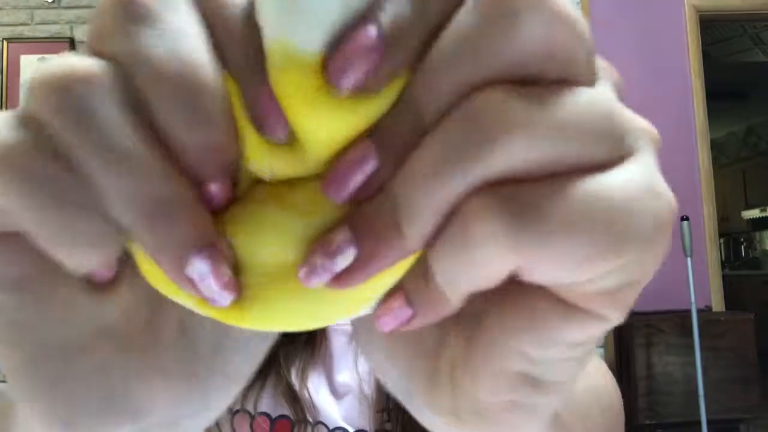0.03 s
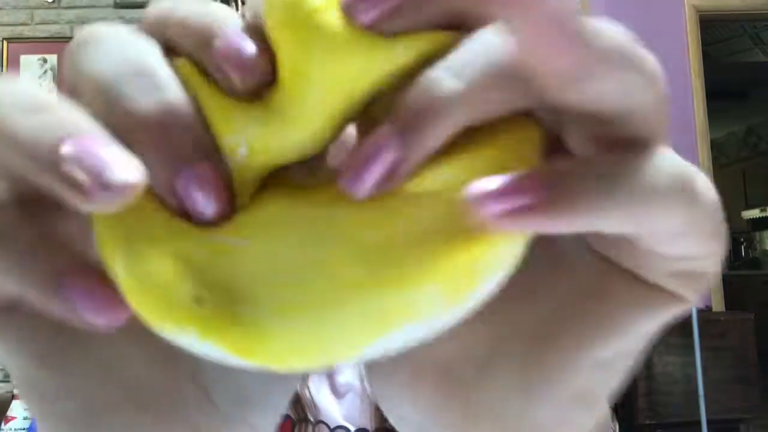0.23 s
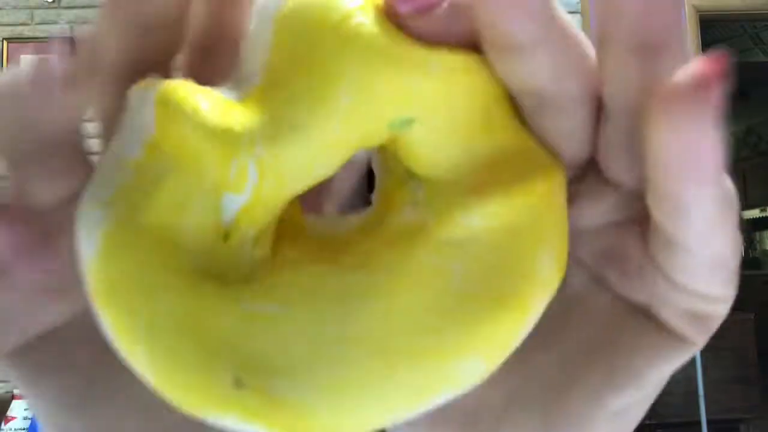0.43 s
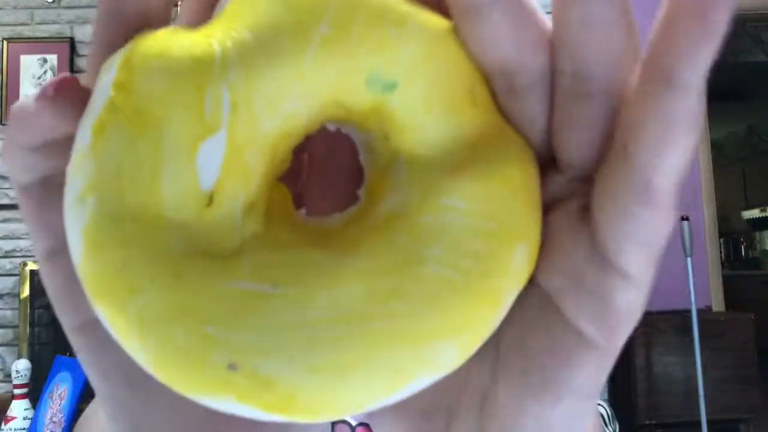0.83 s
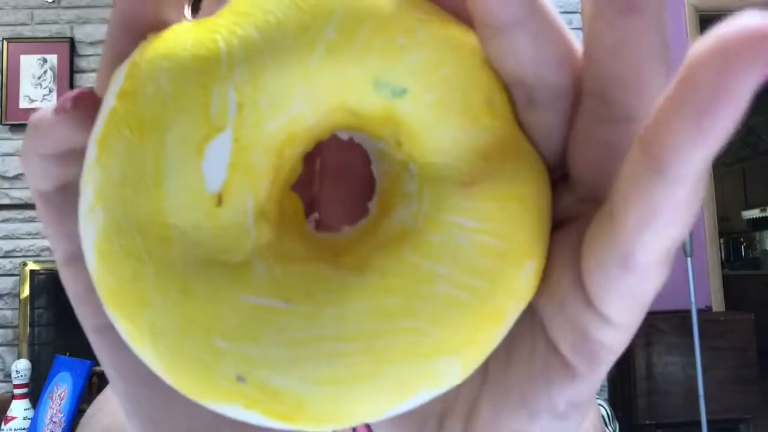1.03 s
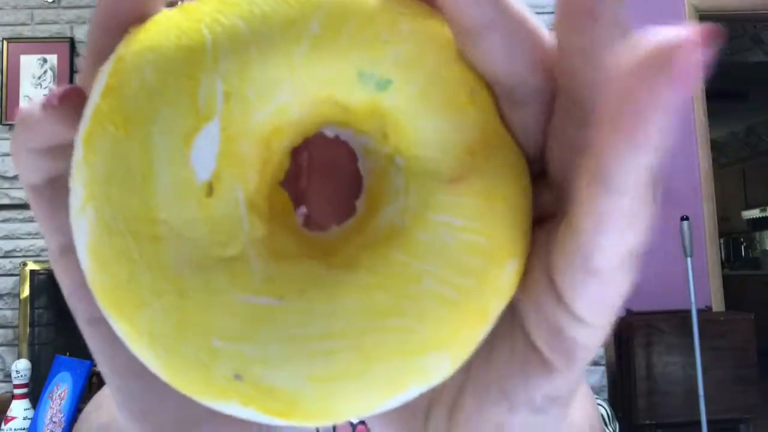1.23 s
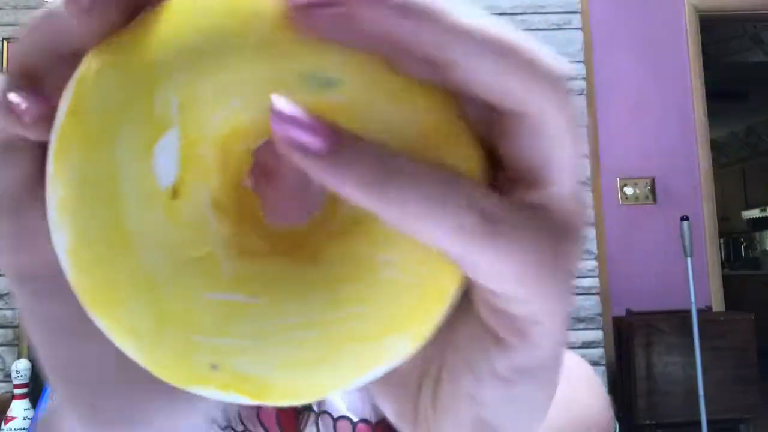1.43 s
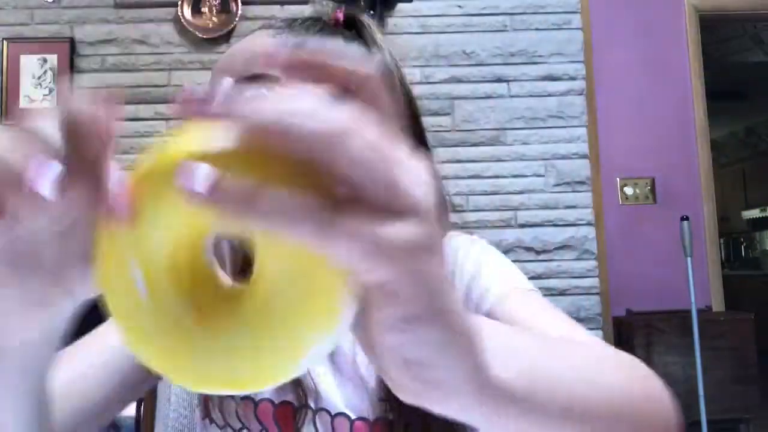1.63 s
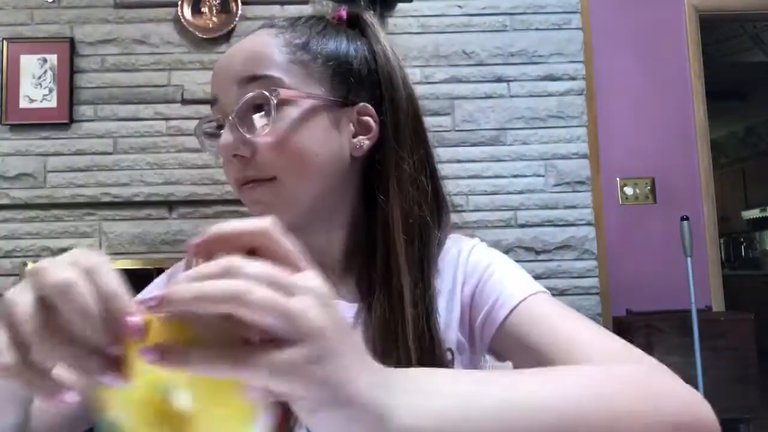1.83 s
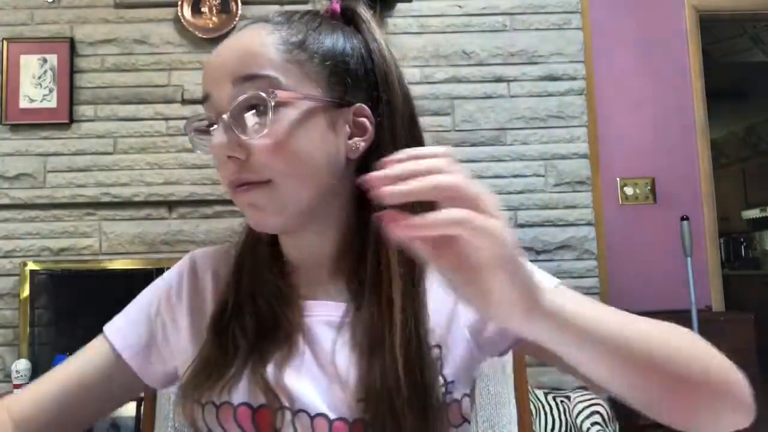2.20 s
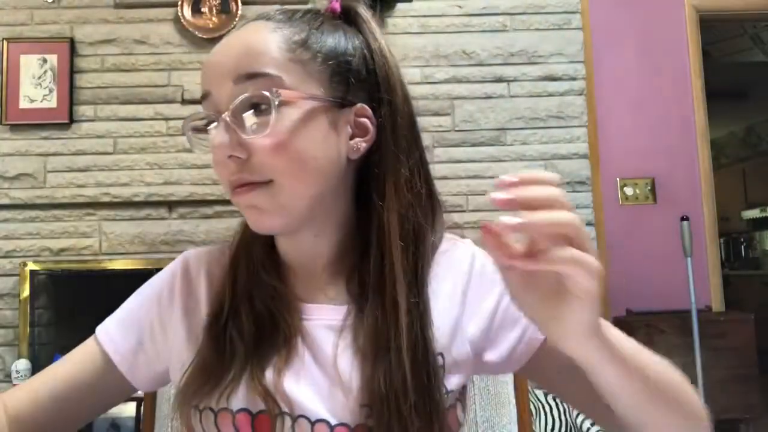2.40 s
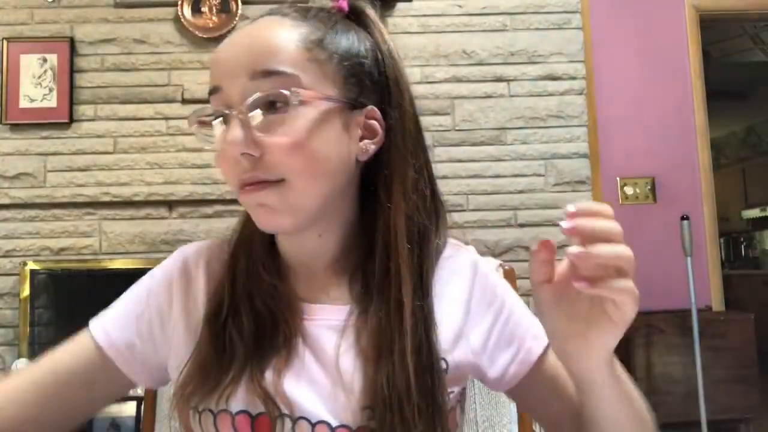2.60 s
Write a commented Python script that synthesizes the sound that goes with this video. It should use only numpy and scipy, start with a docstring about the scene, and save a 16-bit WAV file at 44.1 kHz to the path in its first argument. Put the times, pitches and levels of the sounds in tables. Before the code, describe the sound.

A squeezed foam toy is released close by, its tacky skin peeling apart in a dense crackle with sharp snaps, loudest near 0.4 seconds. After a pause, fingers brush and pat it around 1.7 seconds, followed by faint sleeve and hair rustles. At 2.4 seconds it lands on a table with a soft tap and low thump, then an arm slides faintly away. Ventilation rumbles low in the small room.

```python
"""A foam toy released and put down

Fingers let go of a squeezed foam toy close by: its tacky skin peels apart in a dense crackle with
sharp snaps. The hands shift and brush over it, then it is put down with a soft tap and a low thump
of the table; an arm slides away. The room is small, dry and quiet, with a low ventilation rumble."""
import sys
import numpy as np
from scipy import signal
from scipy.fft import rfft, irfft
from scipy.io import wavfile
from scipy.ndimage import uniform_filter1d

SR = 44100
rng = np.random.default_rng(int(sys.argv[2]) if len(sys.argv) > 2 else 0)


def master(y):
    """Save y as 16-bit WAV."""
    cut = np.clip(np.atleast_2d(y).T, -1, 1)
    pcm = np.round(cut * 32767)  # scale
    wavfile.write(sys.argv[1], SR, pcm.astype(np.int16))


N = 121275

# Spectra of the ventilation and of the room's tail. Each row: frequency in Hz, relative level in dB.
AIR_COLOUR = [(32, -28), (45, -16), (76, -9.5), (111, -3), (160, -4), (250, -9), (400, -13.5), (550, -19.5),
              (820, -23.5), (2000, -32.5), (4740, -35), (7500, -38), (9000, -41.5), (16000, -44)]
ROOM_COLOUR = [(200, -16), (3000, 3), (14000, -15)]
# Strokes of contact. Each row: time of the peak, rise and fall, all in seconds, level in dB.
SLIDES = [(2.73, 0.11, .1, -67.5)]  # the arm on the table
BRUSHES = [(1.655, 0.024, 0.0099, -54.5), (1.685, 0.015, 0.012, -49.5), (1.732, 0.017, 0.008, -55.5),
           (1.776, 0.019, .035, -57)]  # fingers on the foam
RUSTLES = [(1.993, 0.0087, 0.01, -62.5), (2.251, .003, 0.004, -54.5), (2.283, 0.021, 0.014, -59),
           (2.445, 0.026, 0.03, -59.5)]  # sleeve and hair
BUMPS = [(0.39, 0.0076, 0.027, -51), (1.6, 0.11, 0.071, -54.5), (2.207, 0.0074, 0.0085, -50.5)]  # the foam springing back and shifting
# Spectra of those strokes. Each row: frequency in Hz, relative level in dB.
SLIDE_COLOUR = [(400, -6), (900, -16), (1500, 9), (2200, 2), (3200, -19), (8000, -33)]
BRUSH_COLOUR = [(300, -22), (1100, 4.5), (2500, 2), (5000, 2), (12000, 1), (16000, -1)]
RUSTLE_COLOUR = [(400, -2), (1000, 1), (2000, 11.5), (3500, -1.5), (6500, 6), (9000, -8), (16000, -14)]
BUMP_COLOUR = [(50, -28), (150, 12.5), (280, -2), (600, -9), (2000, -36)]
# Taps on the table. Each row: start in seconds, relative level in dB.
TAPS = [(2.4279, -37), (2.4395, -55), (2.4528, -49)]
# Spectrum of a tap's click. Each row: frequency in Hz, relative level in dB.
TAP_COLOUR = [(200, -5), (600, 12), (1030, 6), (1500, -21), (2270, -1.5), (4300, -6), (5500, -5),
              (8000, -10), (16000, -15)]
# Low and high modes of the board. Each row: frequency in Hz, relative level in dB, T60 in seconds.
THUMP_MODES = [(77, 2.5, 0.17), (97, -4.5, 0.36), (127, -7.5, 0.22), (152.5, -9, 0.3), (218, -3, 0.059),
               (307, -9.5, 0.054)]
KNOCK_MODES = [(1030, 1.5, 0.026), (1680, 2.5, 0.024), (2220, 6.5, 0.016), (3020, 5.5, 0.011),
               (3530, 2, 0.014), (5480, 6, 0.011), (7440, 0, 0.007)]
# Fingertip pats on the foam. Each row: start in seconds, level in dB over 1 ms, initial pitch in Hz.
PATS = [(0.3139, -34, 1790), (1.6406, -38, 1280), (1.6502, -37.5, 1220), (1.6744, -40, 1250)]
# Snaps and low pops of the skin, and ticks of nails.
# Each row: start in seconds, level in dB over 1 ms, lower and upper band edges in Hz.
SNAPS = [(.068, -45.5, 2500, 8000), (0.1442, -41, 1200, 4000), (0.1593, -42.5, 2500, 6000),
         (0.195, -42, 800, 1800), (0.2237, -34, 890, 7000), (0.2334, -31, 700, 7000),
         (0.2469, -34, 1800, 8000), (.2562, -32, 164, 350), (0.2572, -25, 4600, 13100),
         (0.2593, -38.5, 454, 2000), (0.2762, -43, 1500, 3000), (0.2771, -34, 650, 8000),
         (0.3128, -28, 1400, 7000), (0.3337, -39, 1800, 8000), (0.3509, -37, 1050, 1740),
         (0.37, -42, 1500, 8000), (0.3733, -39, 700, 5000), (0.382, -28, 796, 7060),
         (0.3919, -24.5, 1300, 12400), (0.3964, -28.5, 1300, 9700), (0.4132, -42, 1500, 11000),
         (0.4175, -34.5, 895, 3960), (1.64, -37.5, 4000, 15000), (1.6497, -38.5, 3270, 5100),
         (1.6666, -51, 7000, 15000), (1.675, -41.5, 3000, 4970), (1.7628, -51.5, 1300, 6000),
         (1.947, -43.5, 1380, 9400), (2.0819, -50.5, 3900, 15000), (2.1125, -49, 1800, 10000),
         (2.251, -54, 5000, 10000), (2.256, -49.5, 5500, 7500), (2.276, -53, 1400, 6000),
         (2.5107, -52.5, 1000, 11000)]
# Envelope of the peeling as the foam swells back. Each row: time in seconds, relative level in dB.
PEEL_ENVELOPE = [(.03, -90), (.08, -57), (.1, -53), (.15, -53), (.172, -50), (.192, -48.5), (0.222, -37),
                 (.243, -43), (.268, -40), (0.279, -34.5), (.288, -56), (.325, -50), (0.356, -50.5),
                 (.372, -35.5), (.379, -35.5), (.389, -29), (0.3968, -25.5), (0.4, -40), (.409, -42.5),
                 (0.415, -35.5), (0.438, -53), (.455, -63)]
# Spectrum of the peeling. Each row: frequency in Hz, relative level in dB.
PEEL_COLOUR = [(120, 1), (330, -6.5), (520, -1), (640, -4.5), (810, .5), (1000, -3), (1200, -0.5),
               (1530, -1), (2050, -8), (2480, -3.5), (3050, -10), (3600, -4.5), (4600, -7), (5500, -5),
               (7800, -7), (8600, -9.5), (13000, -5.5), (16000, -12)]

SKIN_LAG_S = .0013  # in a chirp of the skin, 1 kHz arrives this long after the highest frequencies


def undb(db):
    """Decibels converted to an amplitude ratio."""
    return 10 ** (np.asarray(db) / 20)


def unit(x):
    """Normalisation to an rms of 1."""
    return x / np.sqrt(np.mean(x ** 2))


def colour(x, points):
    """Spectral shaping by a curve through (Hz, dB) points."""
    hz, db = np.array(points).T
    f = np.maximum(np.fft.rfftfreq(len(x), 1 / SR), 1)
    return irfft(rfft(x) * undb(np.interp(np.log(f), np.log(hz), db)), len(x))


def drift(knots_per_s):
    """Slow fluctuation: linear interpolation between random values of spread 1."""
    knots = rng.standard_normal(1024)
    return np.interp(np.arange(N) / SR * knots_per_s, np.arange(len(knots)), knots)


def add(out, start, x):
    """Superposition of a sound from a start in seconds."""
    i = max(int(start * SR), 0)
    out[i:i + len(x)] += x[:max(N - i, 0)]


def burst(x, db):
    """Energy scaling: a transient carries as much as 1 ms of sound at this level."""
    return x * undb(db) * np.sqrt(SR / 1000 / np.sum(x ** 2))


def chirp(low_hz, high_hz, lag_s, body_gain=0, body_hz=486):
    """Dispersion: a band-limited click whose delay varies as 1/f, so that its pitch falls."""
    f = np.maximum(np.fft.rfftfreq(2048, 1 / SR), 1)
    highpass = 1 / np.sqrt(1 + (low_hz / f) ** 8)
    body = body_gain / np.sqrt(1 + (body_hz / f) ** 8)  # a shelf reaching down to body_hz
    gain = np.maximum(highpass, body) / np.sqrt(1 + (f / high_hz) ** 5)
    phase_cycles = lag_s * 1000 * np.log(f) + f * 4 / SR
    return irfft(gain * np.exp(-2j * np.pi * phase_cycles))[:1024]


def rings(t, modes, rise_cycles):
    """Modal vibration: each mode builds up over its first cycles and decays exponentially."""
    out = np.zeros(N)
    for hz, db, t60 in modes:
        onset = 1 - np.exp(-(t * hz / rise_cycles) ** 2)
        out += undb(db - 60 * t / t60) * np.sin(2 * np.pi * hz * t) * onset
    return out


def friction(t, strokes, spectrum, rough_db):
    """Sliding friction: noise, made grainy by random catches, swells and fades with each stroke."""
    swell = sum(undb(db) * np.exp(-((t - peak) / np.where(t < peak, rise, fall)) ** 2)
                for peak, rise, fall, db in strokes)
    roughness = unit(uniform_filter1d(rng.standard_normal(N), size=40))
    catches = undb(rough_db * np.tanh(roughness))
    return swell * unit(colour(rng.standard_normal(N) * catches, spectrum))


def ventilation(t, air_db=-53, hum_hz=114.7, hum_db=-61.5):
    """Broadband rumble and faint hiss, with a hum under slow amplitude and phase modulation."""
    air = unit(colour(rng.standard_normal(N), AIR_COLOUR)) * undb(air_db + 1.1 * drift(4.23))
    hum = np.sin(2 * np.pi * hum_hz * t + drift(8.97)) * undb(2.5 * drift(7.55))
    return air + undb(hum_db) * unit(hum)


def room(x, t, t60_s=.17, tail_db=-26, wall_s=.0038, wall_db=-19.5):
    """Reverberation: one near reflection and a short, dull tail follow the direct sound."""
    tail = colour(rng.standard_normal(N), ROOM_COLOUR)
    tail *= undb(-60 * t / t60_s) * (t > wall_s)
    response = undb(tail_db) * tail / np.sqrt(np.sum(tail ** 2))
    add(response, wall_s, undb([wall_db]))
    return x + signal.fftconvolve(x, response)[:N]


def arm(t):
    """Friction of an arm sliding away over the table."""
    return friction(t, SLIDES, SLIDE_COLOUR, rough_db=6)


def hands(t):
    """Friction of fingers on the foam, and the rougher rustle of sleeve and hair."""
    brushes = friction(t, BRUSHES, BRUSH_COLOUR, rough_db=4.5)
    return brushes + friction(t, RUSTLES, RUSTLE_COLOUR, rough_db=12)


def table(t, thump_s=2.4285):
    """Impact on a board: each tap disperses into a chirp and excites the modes of a woody knock."""
    out = np.zeros(N)
    click = colour(chirp(low_hz=300, high_hz=14000, lag_s=.0016), TAP_COLOUR)
    knock = rings(t, KNOCK_MODES, rise_cycles=.74)
    for start, db in TAPS:
        add(out, start, burst(click, db - 4))
        add(out, start, burst(knock, db + .5))
    thump = rings(t, THUMP_MODES, rise_cycles=1.23)  # the first tap sets the board booming low, its deeper modes building up later
    add(out, thump_s, undb(-28) * thump)
    return out


def bumps(t):
    """Elastic recovery: the foam springs back and shifts in the hands with dull swells of noise."""
    return friction(t, BUMPS, BUMP_COLOUR, rough_db=-2.5)


def pats(t, decay_s=.00027, sag_s=.0031):
    """Damped oscillation: under a fingertip the foam rings for a few cycles, sinking in pitch."""
    out = np.zeros(N)
    for start, db, hz in PATS:
        cycles = hz * sag_s * (1 - np.exp(-t / sag_s))
        ring = np.sin(2 * np.pi * cycles) * t * np.exp(-t / decay_s)
        add(out, start, burst(ring, db))
    return out


def snaps():
    """Impulsive release: larger patches of skin let go, or a nail ticks, each as a falling chirp."""
    out = np.zeros(N)
    tilt = [(250, 0), (16000, -6)]  # 1 dB down per octave
    for start, db, low_hz, high_hz in SNAPS:
        snap = chirp(low_hz, high_hz, SKIN_LAG_S, body_gain=undb(-17))
        add(out, start, burst(colour(snap, tilt), db))
    return out


def crinkles(t, per_s=420, low_hz=890, high_hz=8800, decay_cycles=2.6, spread_db=9):
    """Free vibration: small patches of skin flick loose, each ringing briefly at its own pitch."""
    out, age = np.zeros(N), t[:1024]
    for when, pitch, size in rng.random((int(per_s * t[-1]), 3)):
        hz = low_hz + (high_hz - low_hz) * pitch
        ring = np.sin(2 * np.pi * hz * age) * np.exp(-age * hz / decay_cycles)
        add(out, when * t[-1], burst(ring, spread_db * size))
    return unit(out)


def breaks(per_s=3000, spread_db=5, low_hz=607, high_hz=9000, registers=7):
    """A Poisson process: tiny adhesions break, each a chirp of random size and register."""
    out = np.zeros(N)
    for octave in np.linspace(-1, 1, registers):
        hits = rng.random(N) < per_s / registers / SR
        sizes = undb(spread_db * np.clip(rng.standard_normal(N), -2, 1.5))
        signs = rng.choice([-1, 1], N)
        grain = chirp(low_hz * 2 ** octave, high_hz * 2 ** octave, SKIN_LAG_S)
        out += signal.fftconvolve(hits * sizes * signs, grain)[:N]
    return unit(out)


def peel(t, crinkle_db=-6.5, fizz_db=-7, gain_db=-1):
    """Adhesive failure: the skin comes unstuck in tiny breaks, coarser crinkles and a fine fizz."""
    grains = breaks() + undb(crinkle_db) * crinkles(t)
    fizz = undb(fizz_db) * rng.standard_normal(N)
    crackle = unit(colour(grains + fizz, PEEL_COLOUR))
    times, db = np.array(PEEL_ENVELOPE).T
    return crackle * undb(gain_db + np.interp(t, times, db, left=-np.inf, right=-np.inf))


def scene():
    """Superposition of toy, hands, arm and table in the room, over the ventilation."""
    t = np.arange(N) / SR
    toy = peel(t) + snaps() + pats(t) + bumps(t)
    direct = toy + hands(t) + arm(t) + table(t)
    return (room(direct, t) + ventilation(t))[None]


def record(dry):
    """Band limiting removes the deepest bass and the highest treble."""
    low_cut = signal.butter(3, 37, "high", fs=SR, output="sos")
    high_cut = signal.ellip(10, .2, 80, 16200, fs=SR, output="sos")
    return signal.sosfilt(high_cut, signal.sosfilt(low_cut, dry))


dry = scene()
out = record(dry)
master(out)
```